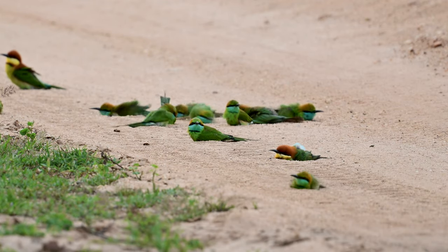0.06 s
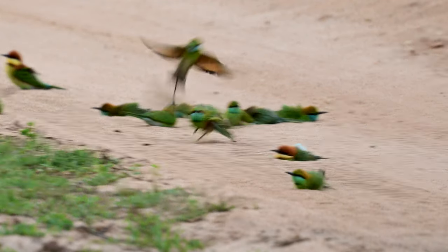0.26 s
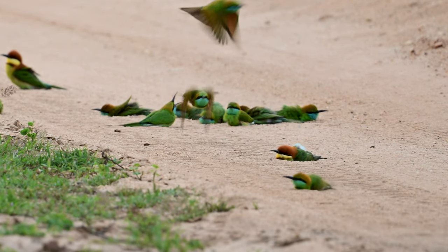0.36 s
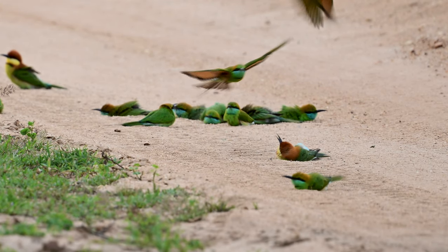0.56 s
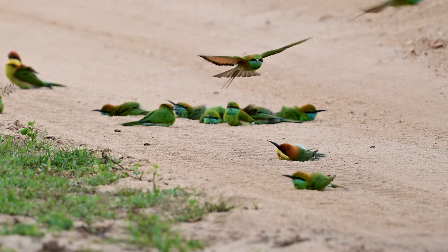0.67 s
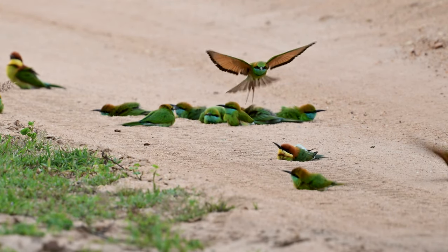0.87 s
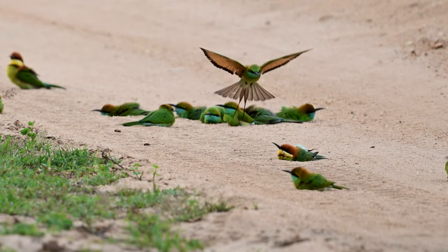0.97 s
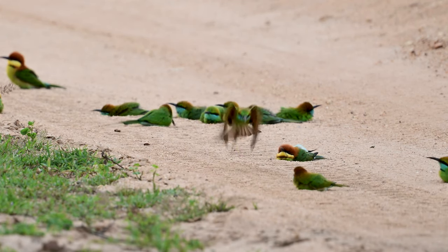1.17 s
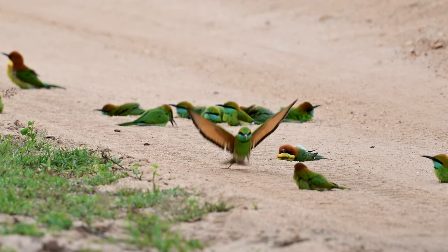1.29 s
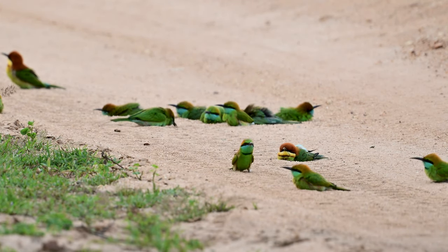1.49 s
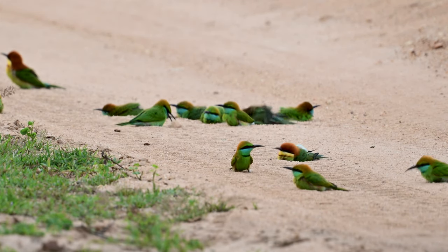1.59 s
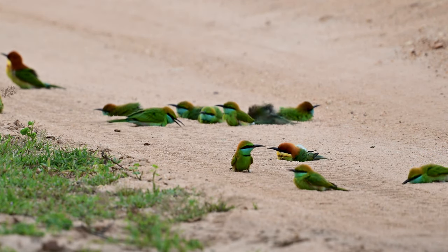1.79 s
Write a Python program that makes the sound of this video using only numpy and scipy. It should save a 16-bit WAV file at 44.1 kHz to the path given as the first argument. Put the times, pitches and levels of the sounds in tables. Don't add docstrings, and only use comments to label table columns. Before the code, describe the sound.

Bird chirps on an open sandy track, two short and bright near the centre, then a wide gliding whistle slightly right; distant whistles and trills, feather rustle early, low wind rumble, microphone at moderate distance.

```python
import sys
import numpy as np
from scipy import signal
from scipy.fft import rfft, irfft
from scipy.io import wavfile
from scipy.ndimage import uniform_filter1d

SR = 44100
rng = np.random.default_rng(int(sys.argv[2]) if len(sys.argv) > 2 else 0)


def dump_mix(stems):
    frames = np.atleast_2d(stems).T
    limited = np.clip(frames, -1, 1)
    pcm = np.round(limited * 32767).astype(np.int16)
    wavfile.write(sys.argv[1], SR, pcm)


def ratio(d):
    e = np.asarray(d, float) / 20
    return 10 ** e


N = 81585
LEAD = 11025
T = (np.arange(N + LEAD) - LEAD) / SR


def walk(rate_hz):
    span = int(SR / rate_hz)
    drift = uniform_filter1d(uniform_filter1d(rng.standard_normal(len(T)), span), span)
    return drift / drift.std()


def pan(pan_db):
    return ratio(np.array([[pan_db], [-pan_db]]) / 2)


def whistle(hz, gain, overtones_db=()):
    phase = 2 * np.pi * np.cumsum(hz) / SR
    tone = np.sin(phase)
    for harmonic, db in enumerate(overtones_db, start=2):
        tone = tone + ratio(db) * np.sin(harmonic * phase)
    return gain * tone * np.sqrt(2)


def sing(rows, overtones_db=()):
    s, hz, db = np.array(rows).T
    fade = np.clip(np.minimum(T - s[0], s[-1] - T) / .003, 0, 1)
    glide = uniform_filter1d(np.interp(T, s, hz), size=200)
    return whistle(glide, fade * ratio(np.interp(T, s, db)), overtones_db)


def place(call, pan_db, wet_db, likeness, lag=0, bright=0., near_db=0.):
    trees_t60_s, trees_first_s, trees_build_s, tail_dull_hz = 0.79, 0.0023, 0.0017, 5200
    bushes_t60_s, bushes_db = 0.13, 3.5
    u = np.arange(SR) / SR
    build = 1 - np.exp(-np.maximum(u - trees_first_s, 0) / trees_build_s)
    trees = build * ratio(-60 * u / trees_t60_s)
    bushes = ratio(bushes_db + near_db - 60 * u / bushes_t60_s) * (u > .001)

    mid, side = rng.standard_normal((2, SR))
    side = side * np.sqrt((1 - likeness) / (1 + likeness))
    tail = np.array([mid + side, mid - side])
    tail = tail / np.sqrt(np.mean(np.sum((tail * trees) ** 2, axis=1))) * (trees + bushes)
    tail = signal.sosfilt(signal.butter(4, tail_dull_hz, fs=SR, output="sos"), tail)
    treble = signal.sosfilt(signal.butter(4, 3700, "highpass", fs=SR, output="sos"), tail)
    tail = tail + bright * treble

    direct = np.array([call, np.roll(call, lag)]) * pan(pan_db)
    return direct + ratio(wet_db) * signal.fftconvolve(call[None], tail, axes=1)[:, :len(T)]


def breeze(points, db, pan_db, flicker_db):
    alike_below_hz = 365
    f = np.maximum(np.arange(len(T) // 2 + 1) * SR / len(T), 1)
    hz, colour_db = np.array(points).T
    colour = ratio(np.interp(np.log(f), np.log(hz), colour_db)) * (f > hz[0] * .8) * (f < hz[-1])
    wide = 1 / np.sqrt(1 + (alike_below_hz / f) ** 2.37)
    mid, side = rfft(rng.standard_normal((2, len(T)))) * colour
    both = np.array([mid + wide * side, mid - wide * side]) / np.sqrt(1 + wide ** 2)
    both = both * ratio(wide * np.array([[pan_db], [-pan_db]]) / 2)
    out = 0
    for octave in np.arange(np.floor(np.log2(hz[0])), np.ceil(np.log2(hz[-1])) + 1):
        band = np.clip(1 - np.abs(np.log2(f) - octave), 0, 1)
        out = out + irfft(both * band, len(T)) * ratio(flicker_db * walk(4.5))
    return out * ratio(db) / out.mean(axis=0).std()


def wind():
    # pitch_hz, density_db [dB per Hz]
    air_colour = [(12, -11), (20, -3.5), (60, -1.5), (136, -10), (231, -6.5), (482, -13), (914, -16),
                  (1330, -20.5), (1800, -43), (2340, -72.5), (3960, -120)]
    return breeze(air_colour, -35.5, pan_db=3.5, flicker_db=0.86)


def far_chorus():
    # pitch_hz, density_db [dB per Hz]
    chorus_colour = [(880, -59.5), (1500, -1), (1760, 1.5), (2270, 8.5), (3380, 2), (4640, -8.5),
                     (5600, -11), (6890, -15.5), (16000, -21.5)]
    return breeze(chorus_colour, -40, pan_db=1, flicker_db=0.7)


def hum():
    # pitch_hz, level_db
    drones = [(48.4, -44.5)]
    return sum(whistle(hz * (1 + 0.044 * walk(4.5)), ratio(db + 1.4 * walk(5))) for hz, db in drones)


def chirps():
    # start_s of the note, pitch_hz, level_db, length_s, swell_db
    chirp_notes = [
        (-.19, 2447, -15, 0.045, 4),
        (0.123, 2514, -9, 0.043, -1),
        (0.43, 2479, -9, 0.05, 1.3),
    ]
    # time_s from the note's start, pitch_hz, level_db against the note
    lead_in = [
        (-.032, 5150, -42),
        (-.024, 5350, -34),
        (-.013, 5550, -34),
        (-.009, 4800, -39),
        (-.004, 3600, -21),
        (0, 3300, -18),
        (.004, 3150, -45),
    ]
    # delay_s, level_db
    tree_line = [
        (.045, -22.5),
        (.092, -19.5),
        (.152, -23.5),
    ]
    scoop_hz, scoop_s = 70, .008
    attack_s, attack_db, release_s = .017, -13, .003
    flick_hz, flick_s, flick_db = 1850, .011, -21

    out = 0
    for s, hz, db, length, swell_db in chirp_notes:
        u = T - s
        onset = sing([(s + at, pitch, db + rel_db) for at, pitch, rel_db in lead_in])
        out = out + onset * ratio(2.5 * walk(400))

        scoop = scoop_hz * np.exp(-np.maximum(u, 0) / scoop_s)
        flick = np.clip((u - length + release_s) / (flick_s + release_s), 0, 1) * (flick_hz - hz)
        times = [0, attack_s, length - release_s, length + .001, length + flick_s]
        swell = np.interp(u, times, ratio(np.array([attack_db, 0, swell_db, flick_db, flick_db - 6])))
        fade = np.clip(np.minimum(u + 0.0024, length + flick_s - u) / 0.00057, 0, 1)
        out = out + whistle(hz - scoop + flick, fade * ratio(db) * swell, overtones_db=(-50, -49))

    echoes = sum(ratio(db) * np.roll(out, int(s * SR)) for s, db in tree_line)
    return place(out, 1, -12, likeness=0.3, near_db=-4.0) + echoes


def wings():
    # centre_s, half_length_s, pitch_hz, width_hz, level_db
    rustles = [(.12, .08, 6300, 2800, -45), (.005, .035, 4750, 900, -38), (.25, .07, 4450, 1500, -39.5),
               (.13, .05, 4700, 1600, -43), (.375, .018, 8700, 1000, -53), (.42, .05, 3000, 1000, -33),
               (.14, .02, 3500, 700, -37), (.85, .02, 6900, 1400, -54), (1.025, .005, 7800, 1500, -52),
               (1.58, .012, 5000, 900, -52), (1.0, .09, 4050, 900, -40), (.56, .05, 3300, 900, -43)]
    out = 0
    for s, half_s, hz, width_hz, db in rustles:
        band = [hz - width_hz / 2, hz + width_hz / 2]
        sos = signal.butter(3, band, "bandpass", fs=SR, output="sos")
        burst = signal.sosfilt(sos, rng.standard_normal((2, len(T))))
        swell = np.exp(-.5 * ((T - s) / half_s) ** 2)
        out = out + burst / burst.std() * ratio(db + 3 + 1.2 * walk(60)) * swell
    return out * pan(3.5)


def far_calls():
    # start_s, length_s, first_hz, last_hz, level_db
    far_notes = [(.005, .04, 3000, 2450, -40), (.03, .046, 3920, 3921, -35), (.097, .022, 4450, 3900, -39),
                 (.278, .07, 3250, 3150, -37), (.305, .032, 2660, 2680, -28.5),
                 (.465, .055, 3850, 3780, -44.5), (.525, .025, 2700, 3300, -43),
                 (1.515, .02, 2300, 2050, -34), (1.61, .03, 2400, 2250, -38.5),
                 (1.64, .03, 3130, 3050, -42), (1.6, .085, 5600, 5500, -53.5), (1.79, .06, 1950, 2050, -41),
                 (1.815, .03, 3150, 3000, -42), (.86, .04, 2080, 2060, -43), (.91, .08, 2000, 1950, -47),
                 (.79, .04, 2480, 2420, -45), (1.115, .08, 2400, 2150, -42)]
    # time_s, pitch_hz, level_db
    warbles = [
        [(.351, 3220, -38), (.355, 3150, -25), (.362, 2974, -22), (.378, 2811, -26), (.384, 2590, -25),
         (.39, 2520, -36)],
        [(.637, 2530, -45), (.651, 2560, -31), (.681, 2780, -35), (.697, 2806, -30), (.708, 2760, -40)],
        [(.8, 3320, -48), (.816, 3224, -35), (.832, 3179, -33), (.855, 3216, -43)],
        [(1.755, 2700, -57), (1.765, 2609, -42), (1.777, 2526, -42), (1.811, 2495, -43), (1.823, 2660, -47),
         (1.835, 2668, -40), (1.85, 2480, -50)],
    ]
    calls = sum(sing(rows) for rows in warbles)
    for s, d, first, last, db in far_notes:
        bend = last - first
        calls = calls + sing([(s, first, db + 4), (s + 0.288 * d, first + 0.317 * bend, db),
                              (s + 0.82 * d, first + 1.1 * bend, db), (s + d, last, db + 3)])
    return place(calls * ratio(0.43 * walk(97)), 3, -3, likeness=0.22, near_db=-7.0)


def low_whistler():
    # time_s, pitch_hz, level_db
    whistles = [
        [(.44, 1842, -47.5), (.455, 1928, -39), (.475, 1922, -34.5), (.544, 1850, -47.5), (.604, 1728, -40.5),
         (.62, 1670, -64)],
        [(.64, 1760, -46.5), (.66, 1880, -40), (.694, 2008, -35.5), (.746, 2127, -46), (.78, 2072, -35.5),
         (.82, 2028, -37), (.84, 1920, -47)],
        [(1.008, 2020, -38), (1.02, 2042, -32), (1.06, 2162, -36), (1.075, 2395, -39), (1.1, 2460, -30),
         (1.115, 2560, -46)],
    ]
    phrases = sum(sing(rows) for rows in whistles) * ratio(1.0 * walk(54))
    return place(phrases, -10, -3, likeness=0.2)


def hoarse_trills():
    # start_s, length_s, first_hz, last_hz, level_db
    far_trills = [(.545, .15, 3750, 4300, -40), (.7, .09, 4400, 4400, -45), (.62, .19, 5700, 6380, -47.5),
                  (.775, .09, 7500, 7500, -48), (.78, .08, 8250, 8200, -52), (.92, .11, 7550, 7500, -50),
                  (.93, .1, 8300, 8200, -54), (1.115, .1, 7600, 7400, -50), (1.385, .1, 7550, 7500, -53),
                  (1.505, .11, 7600, 7500, -51), (1.36, .12, 5800, 5750, -53), (1.73, .12, 3400, 3580, -42),
                  (1.64, .09, 4400, 4380, -53), (1.69, .1, 5500, 5500, -54), (.95, .06, 4300, 4300, -43)]
    settle_s, throb_hz, clear, fade_db_per_s = .018, 600, .9, 32
    out = 0
    for s, d, first, last, db in far_trills:
        fade = np.clip(np.minimum(T - s, s + d - T) / .014, 0, 1)
        hz = last + (first - last) * np.exp(-np.maximum(T - s, 0) / settle_s)
        level_db = db - 5.5 - fade_db_per_s * np.clip(T - s, 0, d)
        out = out + whistle(hz, fade * ratio(level_db) * (clear + walk(throb_hz)))
    return place(out, 3, 2.2, likeness=0.39)


def slides():
    # time_s, pitch_hz, level_db
    rise = [(.828, 2558, -43), (.842, 2690, -24.5), (.864, 2930, -22), (.892, 3395, -12.5),
            (.905, 3576, -18), (.916, 3997, -22.5), (.921, 4340, -26), (.926, 4670, -21), (.929, 4900, -50)]
    fall = [(1.003, 5660, -51), (1.014, 5100, -26), (1.03, 4364, -18.5), (1.055, 3816, -20),
            (1.082, 3300, -12), (1.108, 3050, -17), (1.134, 2722, -15.5), (1.179, 2420, -13),
            (1.201, 2224, -26)]
    dip = [(1.202, 2280, -45), (1.214, 2216, -22.5), (1.242, 2098, -23), (1.249, 2106, -51),
           (1.262, 2095, -20), (1.29, 2072, -22), (1.297, 2020, -56)]
    hook = [(1.302, 2080, -40), (1.311, 2200, -24), (1.328, 2570, -16), (1.345, 2840, -18),
            (1.36, 2930, -20), (1.368, 2950, -45)]
    glides = (rise, fall, dip, hook)
    flutter = ratio(1.18 * walk(190))
    pure = sum(sing(rows) for rows in glides)
    overtones = sum(sing(rows, overtones_db=(-32, -40)) for rows in glides) - pure
    overtones = signal.sosfilt(signal.butter(2, 8500, fs=SR, output="sos"), overtones)
    placed = place(pure * flutter, -4, -6, likeness=0.09, lag=14, bright=0.33, near_db=-1.5)
    return placed + overtones * flutter


def scene():
    floor = wind() + far_chorus() + hum()
    near = chirps() + wings() + slides()
    far = far_calls() + low_whistler() + hoarse_trills()
    return (floor + near + far)[:, LEAD:]


def band_limit(x):
    return signal.sosfilt(signal.butter(12, 16750, fs=SR, output="sos"), x)


def record(dry):
    below = np.arange(N // 2 + 1) * SR / N < 15790
    mix = irfft(rfft(dry) * below, N)
    return band_limit(mix)


dry = scene()
out = record(dry)
dump_mix(out)
```